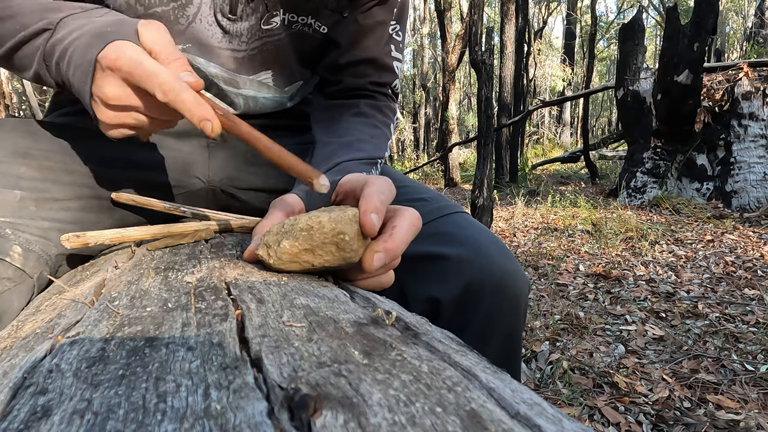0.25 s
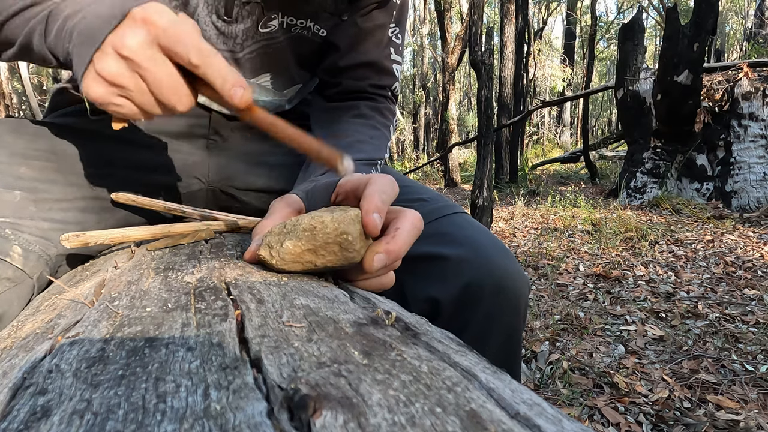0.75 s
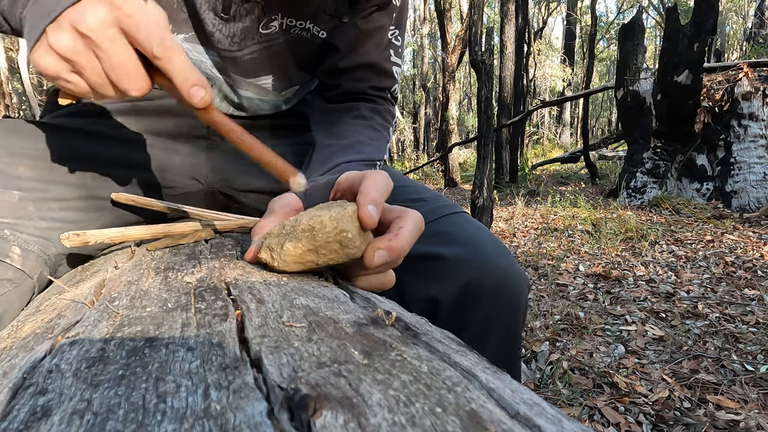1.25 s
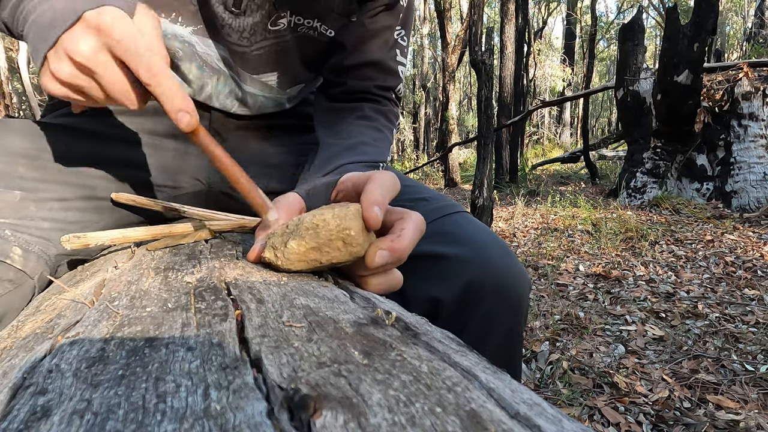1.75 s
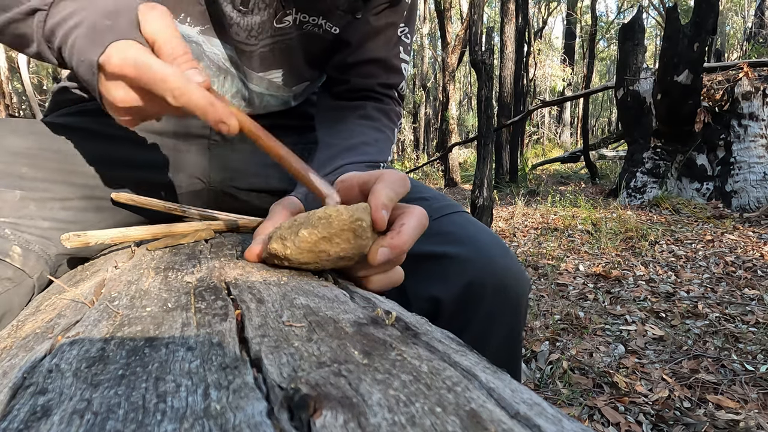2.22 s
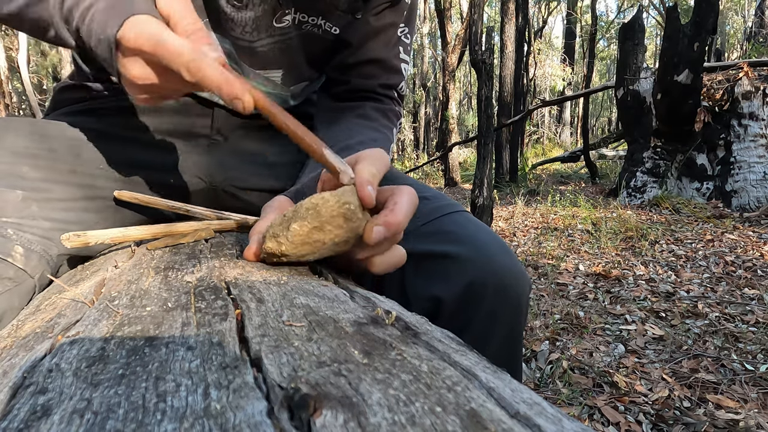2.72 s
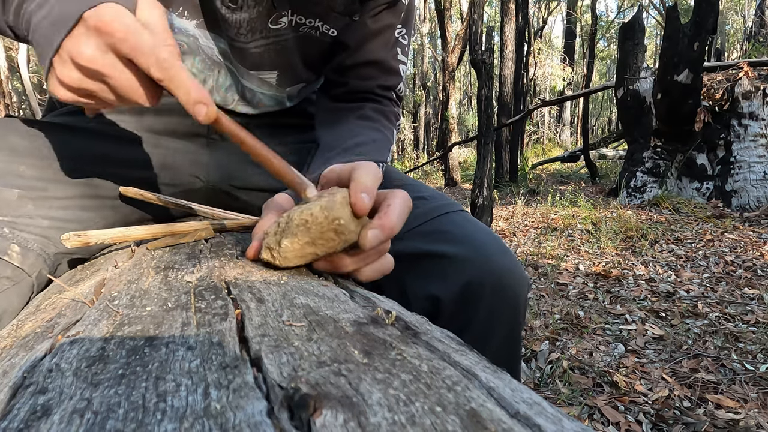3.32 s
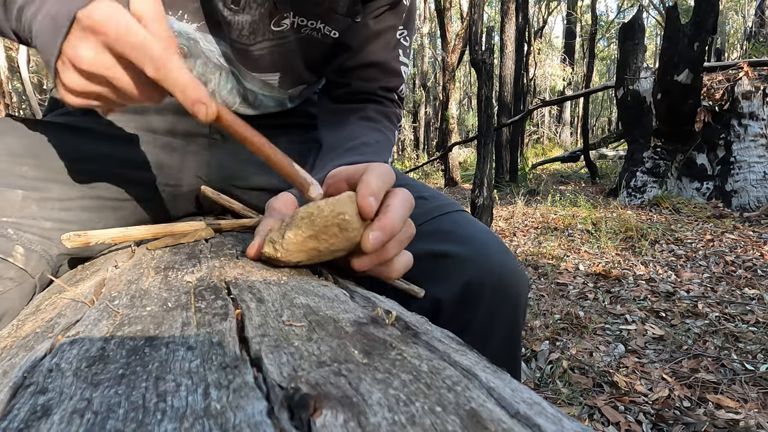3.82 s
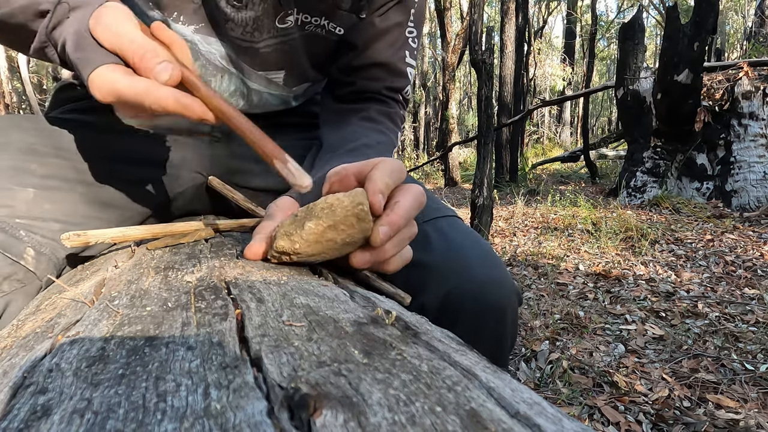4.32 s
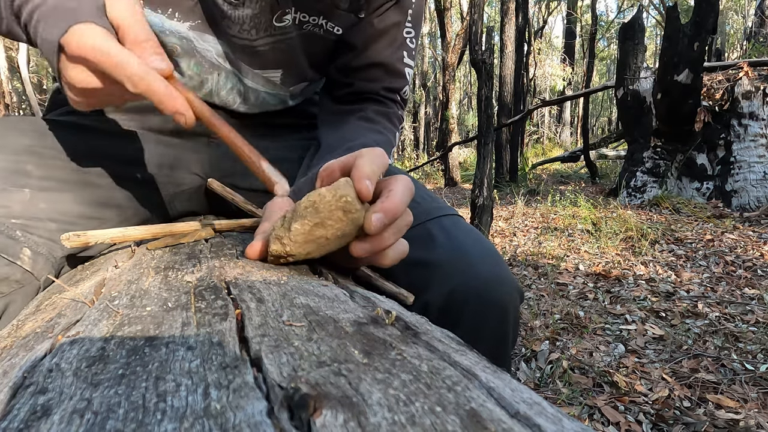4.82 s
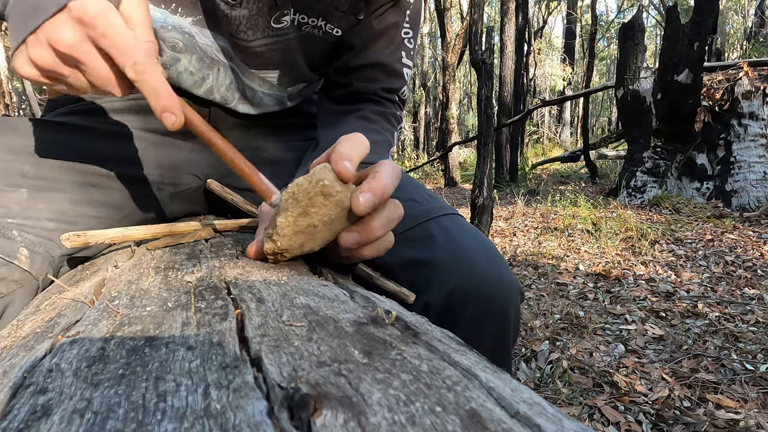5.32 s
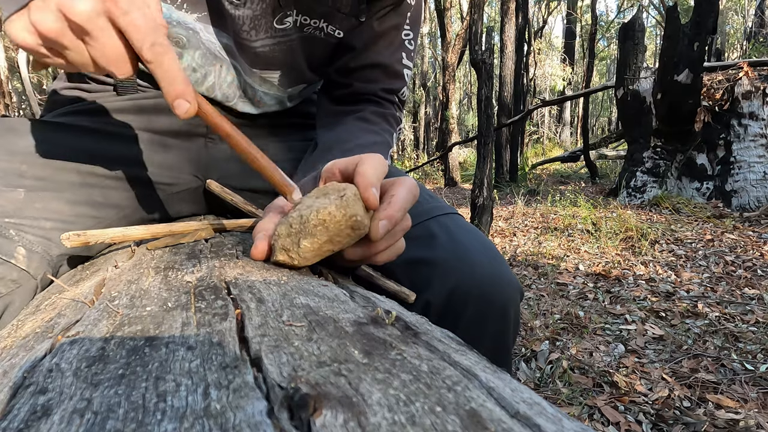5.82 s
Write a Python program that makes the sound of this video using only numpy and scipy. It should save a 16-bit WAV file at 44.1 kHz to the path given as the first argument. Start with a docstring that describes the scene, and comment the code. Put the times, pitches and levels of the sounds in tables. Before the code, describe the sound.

Quiet bushland, heard very close with little echo: soft steady air and faint sleeve rustle. From 0 to 0.4 s a stick makes weak, uneven scrapes on a rough stone; near 0.18 s the stone knocks dully on a log and slides softly. After a short gap, light rasps return at about 0.5 s and settle by 1 s into regular strokes every 0.27 s, each a dry woody tap followed by a tenth-second gritty scrape, many swelling, with bright snaps of grain. At 1.51 s a hollow knock coincides with a tiny, falling squawk. From about 2.1 s low wind rumble flutters at the microphone in gusts. The grinding becomes louder and harsher, with a strong rasp around 4.6 s and sharp taps near 4.3 and 4.8 s. Rustling increases after 3.9 s. Deep soft bumps join around 5.35 and 5.6 s; the final stroke at 5.9 s fades quickly.

```python
"""Stick ground on a hand-held stone

Close in front, in quiet bushland, a wooden stick is ground against a rough stone held over a log.
Blows of force ring the stick's modes as each stroke lands; random tiny slips make the rasp over the grit.
Larger grains snap, a squawk sounds once, and the stone knocks and slides on the log as decaying modes.
Behind are coloured noise for still air, slips for rustling sleeves, and a breeze that starts to rumble
at the microphone."""
import sys
import numpy as np
from scipy import signal
from scipy.fft import rfft, irfft, next_fast_len
from scipy.io import wavfile

SR = 44100
rng = np.random.default_rng(int(sys.argv[2]) if len(sys.argv) > 2 else 0)


def dump_mix(stems):
    """Bounce the given channels to the path in sys.argv[1] as a 16-bit WAV at rate SR."""
    frames = np.atleast_2d(stems).T  # one column per channel
    limited = np.clip(frames, -1, 1)  # hard clip at full scale
    pcm = np.round(limited * 32767).astype(np.int16)
    wavfile.write(sys.argv[1], SR, pcm)


N = 267246
TIME = np.arange(N) / SR  # s

# The tip is pushed across the stone: start t/s, length/s, nominal mid-stroke level/dB,
# swell from start to end/dB, hiss of fine grit relative to the rasp/dB,
# drive of the cupped hand's hollow note relative to the rasp/dB
STROKES = [(.006, .104, -41, -5, -9.5, -27), (0.162, 0.034, -37, 0, -15, -14),
           (0.232, 0.072, -42.5, -4, -10, 8), (0.56, .064, -40.5, 5, -4, 8.5),
           (0.707, 0.13, -43, 5, -0.5, 5.5), (0.968, .14, -40, 14, -3, -6), (1.263, 0.028, -42, 9, -3, -8),
           (1.287, 0.099, -38.5, 5, -3, -21), (1.542, .11, -39.5, 17, -2, -17),
           (1.804, 0.12, -34, 7, -3.5, -5), (2.087, 0.11, -38.5, 15.5, -1, 0),
           (2.351, .15, -35.5, 4, -4.5, -25), (2.626, 0.12, -34, 15, -3.5, -9),
           (2.917, 0.12, -35.5, 0, -3.5, -21), (3.189, .13, -40, 9, 0, -18),
           (3.466, 0.11, -39, 4, -0.5, -29), (3.731, 0.109, -36.5, 17, -3.5, -12),
           (4.007, 0.12, -37, 18, -4, -6), (4.301, 0.13, -35, -3, -7, -10),
           (4.568, 0.1073, -28, 11.5, -7.5, -14), (4.844, 0.13, -35.5, -7.5, -3, -25),
           (5.106, 0.11, -35.5, 1, -1.5, 6.5), (5.38, .093, -36, 9.5, 0, 5),
           (5.648, 0.1, -37, 3.5, 0.5, -1), (5.911, 0.086, -43, -21, 2, 6.5)]


def amp(db):
    """Decibels to gain."""
    return 10 ** (np.asarray(db) / 20)


def evened(x):
    """Scales to an rms of one."""
    return x / np.sqrt(np.mean(x ** 2) + 1e-20)


def shaped(x, gain_db):
    """Filters x, without delay, by a function that gives dB at each frequency."""
    size = next_fast_len(len(x) + 512)
    gain = amp(gain_db(np.fft.rfftfreq(size, 1 / SR)))
    return irfft(rfft(x, size) * gain, size)[:len(x)]


def coloured(x, points):
    """Filters x by a table of f/Hz, level/dB, joined along log frequency."""
    f, db = np.transpose(points)
    return shaped(x, lambda hz: np.interp(np.log(hz + 1), np.log(f), db))


def band(x, hz, kind):
    """Low-pass or high-pass, fourth order."""
    return signal.sosfilt(signal.butter(4, hz, kind, fs=SR, output="sos"), x)


def wander(size, rate):
    """Random values, drawn rate times a second and joined by straight lines."""
    knots = rng.standard_normal(size)
    return np.interp(np.arange(size) * rate / SR, np.arange(size), knots)


def add(mix, s, sound):
    """Mixes a sound in at time s."""
    part = mix[max(round(s * SR), 0):][:len(sound)]
    part += sound[:len(part)]


def blow(x, db):
    """Sets the energy of a short sound, as its level over 5 ms."""
    return amp(db) * x / np.sqrt(np.sum(x ** 2) / (.005 * SR))


def resonance(x, hz, width):
    """A decaying cosine rings at one frequency, with a peak gain near one; width is in Hz."""
    t = np.arange(600) / SR
    decay = np.exp(-np.pi * width * t)
    ring = 2 * decay / decay.sum() * np.cos(2 * np.pi * hz * t)
    return signal.fftconvolve(x, ring)[:N]


def slips(size, rate, spread_db):
    """Tiny slips over the grit: random clicks, rate a second, most small and a few large."""
    hit, height, sign = rng.random((size, 3)).T
    sizes = amp(spread_db * np.minimum(-np.log(1 - height), 4))
    return (hit < rate / SR) * sizes * np.sign(sign - .5)


def still_air(level_db=-56):
    """Still air among the trees: steady coloured noise, its level set above 200 Hz."""
    # Colour of the air: f/Hz, level/dB per Hz
    air_colour = [(12, -41), (20, -33), (112, 0), (175, 7.5), (811, -4.5), (985, -3.5), (1500, -9.5),
                  (1720, -9.5), (2150, -42), (2540, -27), (2760, -57), (3170, -22.5), (7520, -28.5),
                  (12400, -67), (15500, -67)]
    air = coloured(rng.standard_normal(N), air_colour)
    return air * amp(level_db) / np.std(band(air, 200, "high"))


def rustle(trim_db=-3):
    """Hands and sleeves move: dense random slips whose strength wanders."""
    # Level before the trim: t/s, level/dB
    rustle_level = [(0, -56.5), (.45, -55), (1.7, -56.5), (3.65, -53.5), (3.95, -47.5), (4.2, -51.5),
                    (4.9, -51), (5.55, -49.5), (6.0, -50.5)]
    # Colour of the cloth and skin: f/Hz, level/dB per Hz
    rustle_colour = [(100, -0.5), (300, 0.5), (1200, -7), (3500, -12), (7500, -16), (10000, -32),
                     (15000, -35)]
    rubs = slips(N, 6000, 2.5) * amp(3.07 * wander(N, 45))
    level_db = np.interp(TIME, *np.transpose(rustle_level)) + trim_db
    return amp(level_db) * evened(coloured(rubs, rustle_colour))


def wind(flutter_db=5.5, flutter_rate=37):
    """Strength of the breeze: a fluttering level, with gusts that rise and fall in an arch."""
    # Steady breeze at the microphone, before flutter: t/s, level/dB
    breeze_level = [(0, -54), (.8, -60), (1.2, -54.5), (1.7, -60), (2.2, -43), (3.0, -47), (3.3, -43),
                    (3.55, -49), (4.3, -45.5), (5.1, -44), (6.0, -42)]
    # Stronger gusts: start t/s, length/s, peak level/dB
    gust_times = [(2.13, .09, -36.5), (2.302, 0.27, -35), (2.54, 0.24, -33), (2.96, 0.12, -38.5),
                  (3.764, 0.11, -33.5), (4.533, 0.062, -30.5), (4.743, 0.3, -39), (5.136, .08, -34),
                  (5.33, 0.2, -39), (5.53, .37, -32.5)]
    gusts = np.zeros(N)
    for start, length, db in gust_times:
        arch = np.sin(np.pi * np.arange(0, length, 1 / SR) / length)
        add(gusts, start, amp(db) * arch)
    steady_db = np.interp(TIME, *np.transpose(breeze_level))
    steady = amp(steady_db + flutter_db * wander(N, flutter_rate))  # rate in changes per s
    return np.hypot(gusts, steady)


def breeze():
    """Moving air rumbles at the microphone: low noise that follows the wind's strength."""
    # Colour of the rumble: f/Hz, level/dB per Hz
    breeze_colour = [(12, -0.5), (30, 4.5), (65, -3), (100, -13.5), (160, -17.5), (300, -35), (800, -61)]
    return evened(coloured(rng.standard_normal(N), breeze_colour)) * wind()


def surroundings(x, level_db=-23, t60=0.25):
    """Body, ground and trunks scatter faint sound back: a noise tail that falls 60 dB in t60 seconds."""
    t = np.arange(SR // 3) / SR
    tail = rng.standard_normal(len(t)) * amp(-60 * t / t60) * (t > .003)
    return amp(level_db) * signal.fftconvolve(x, tail / np.linalg.norm(tail))[:N]


def thumps(rise=0.0031):
    """The pressing hand bumps the log: soft, low tones that swell over rise seconds and die away."""
    # Bumps: t/s, level over 5 ms/dB, f/Hz, decay/s
    bumps = [(1.511, -31, 172, 0.018), (2.357, -30.5, 159, 0.0044), (2.362, -26.5, 52.5, 0.016),
             (2.41, -32, 140, 0.0054), (3.013, -35.5, 66.6, 0.022), (5.345, -22.5, 55.8, 0.02),
             (5.389, -24.5, 80.5, 0.017), (5.618, -20.5, 61, 0.039), (5.727, -30, 57.3, 0.0083)]
    out, t = np.zeros(N), np.arange(SR // 6) / SR
    for s, db, hz, decay in bumps:
        envelope = np.exp(-t / decay) * (1 - np.exp(-t / rise))
        add(out, s, blow(np.sin(2 * np.pi * hz * t) * envelope, db))
    return out


def knocks(rise=0.00064):
    """The stone rocks against the log, whose decaying modes give a dull, hollow knock."""
    # Knocks: t/s, level over 5 ms/dB
    knock_times = [(0.1763, -33.5), (0.1798, -26), (1.5101, -20), (2.3574, -30)]
    # Modes of the stone on the log: f/Hz, level/dB, t60/s
    log_modes = [(188.6, -12, 0.15), (530, -15, 0.14), (944, 4.5, 0.028), (1020, -3, 0.059),
                 (1420, -6, 0.019), (1540, 3, 0.013)]
    out, t = np.zeros(N), np.arange(SR // 10) / SR
    ring = sum(amp(db - 60 * t / t60) * np.sin(2 * np.pi * hz * t) for hz, db, t60 in log_modes)
    for s, db in knock_times:
        add(out, s, blow(ring * (1 - np.exp(-t / rise)), db))
    return out


# The tip, or the sliding stone, takes hold and lifts off (s)
ATTACK_S, RELEASE_S = 0.012, 0.014


def hold(t, length):
    """Contact takes hold in a straight ramp from 0 to 1 and lifts off in another."""
    return np.clip(np.minimum(t / ATTACK_S, (length - t) / RELEASE_S), 0, 1)


def slide(modes=((990, 190, 0), (1520, 330, -5))):
    """The stone drags softly on the log; slips ring two broad resonances (f/Hz, width/Hz, level/dB)."""
    # The slide: start t/s, length/s, reference level/dB, swell from start to end/dB
    drag = (.075, .125, -39, 7)
    start, length, db, swell_db = drag
    out, t = np.zeros(N), np.arange(0, length, 1 / SR)
    force = slips(len(t), 5000, 2.8)
    sound = sum(amp(mode_db) * resonance(force, hz, width) for hz, width, mode_db in modes)[:len(t)]
    level = amp(db + swell_db * (t / length - 2.5))  # ends 1.5 swells below the reference
    add(out, start, hold(t, length) * level * evened(sound))
    return out


def stick_ring(grip=1, uneven_db=0, rise=0.00054, echo_s=0.001475, echo=0.067):
    """The stick's modes swell briefly and die in the hand; the log's face throws them back."""
    # Modes of the gripped stick against the stone: f/Hz, width/Hz, level/dB
    stick_modes = [(630, 1030, 1), (1006, 172, 5.5), (1327, 306, 4.5), (2060, 363, 3.5), (2733, 336, -0.5),
                   (3530, 670, -4), (4224, 170, -4.5), (5340, 760, -11.5), (6290, 375, -14.5),
                   (7530, 630, -14), (8890, 1250, -23), (11940, 2600, -26)]
    t = np.arange(600) / SR
    ring = np.zeros(len(t))
    for hz, width, db in stick_modes:
        decay = np.exp(-np.pi * width * t) * (1 - np.exp(-t / rise))
        # each point of contact favours other modes, most of all the low ones
        favour_db = uneven_db * rng.standard_normal() * min(1, 3000 / hz)
        ring += amp(db + favour_db) * decay / decay.sum() * np.sin(2 * np.pi * hz * grip * t)
    return ring + echo * np.interp(t - echo_s, t, ring, left=0)


def hardened(x, slope_db, main_db=0, lower_db=0):
    """A harder contact tilts the sound upwards; the grip frees or damps the stick's strongest modes."""
    def gain_db(hz):
        tilt = slope_db * np.log2(np.clip(hz, 1000, 4500) / 1500)
        main = main_db * np.exp(-((hz - 2280) / 560) ** 2)
        lower = lower_db * np.exp(-((hz - 1400) / 250) ** 2)
        return tilt + main + lower
    return shaped(x, gain_db)


def ticks():
    """Crumbs of grit break off: very short noise bursts ring the stick as small bright clicks."""
    # Crumbs: t/s, level over 5 ms/dB
    crumbs = [(0.21, -51), (0.3446, -37.5), (0.377, -54), (3.366, -50), (3.922, -44), (3.954, -42.5)]
    out, t = np.zeros(N), np.arange(400) / SR
    for s, db in crumbs:
        force = rng.standard_normal(len(t)) * np.exp(-t / 0.00059)
        click = hardened(signal.fftconvolve(force, stick_ring()), 2.1)
        add(out, s, blow(click, db))
    return out


def squawk(overtone=0.038):
    """The tip judders once, sticking and slipping in an unsteady cycle that slows as it comes to rest."""
    # Path of the squawk, before its random unsteadiness: t/s, f/Hz, level/dB
    squawk_path = [(1.5085, 1500, -52), (1.511, 1200, -25), (1.512, 880, -18), (1.514, 880, -18.5),
                   (1.516, 950, -29), (1.521, 900, -32), (1.524, 570, -36), (1.537, 540, -45),
                   (1.546, 500, -62)]
    s, hz, db = np.transpose(squawk_path)
    t, out = np.arange(s[0], s[-1], 1 / SR), np.zeros(N)
    pitch = np.interp(t, s, hz) * (1 + .09 * wander(len(t), 500))
    level = amp(np.interp(t, s, db) + 1.8 * wander(len(t), 400))
    phase = 2 * np.pi * np.cumsum(pitch) / SR
    add(out, s[0], np.sqrt(2) * level * (np.sin(phase) + overtone * np.sin(2 * phase)))
    return band(out, 3900, "low")


def catches(crumble_s=0.0023, crumble=0.15, tilt_db=-0.27):
    """The tip catches on a large grain and slips free with a snap and a short spray of noise."""
    # Catches: t/s, level over 5 ms/dB, hardness before the common tilt/dB per octave
    grains = [(0.0233, -35, 2.5), (0.0625, -32, -1), (0.0681, -31.5, 1), (0.2641, -29.5, -1),
              (.29, -37, -2), (.7354, -29.5, 19), (.7989, -34, 8), (.8227, -35.5, -22), (1.079, -28.5, 2),
              (1.0964, -28, -8), (1.3088, -29, 5), (1.3507, -26.5, -0.5), (1.6241, -22, 0.5),
              (1.6318, -22, 0), (1.856, -31.5, 29), (1.9045, -19, 2.5), (2.139, -28.5, 2),
              (2.1667, -26, -6), (2.414, -25.5, 2.5), (2.4671, -29, 7), (2.6726, -30, 4),
              (2.6967, -21.5, 11), (2.7317, -22, 4), (2.7356, -21.5, -1.5), (2.941, -20.5, -3),
              (3.0097, -19.5, 1), (3.0162, -25, 3), (3.283, -31, 5), (3.3022, -31, -14),
              (3.4822, -28.5, -1.5), (3.55, -26.5, 1), (3.7492, -25.5, 3), (3.7898, -20, 2),
              (3.8217, -23.5, 0), (4.0485, -31, 4), (4.0658, -26, -3.5), (4.101, -25, -13),
              (4.3315, -30, 1.5), (4.3376, -35, 3), (4.3958, -28.5, -4), (4.6035, -35, 0), (4.619, -29, -1),
              (4.6458, -20, -2), (4.6549, -22.5, -5), (4.8754, -31, 1.5), (5.124, -24, 4.5),
              (5.1416, -26, 2), (5.16, -26, -0.5), (5.172, -25, -10), (5.3928, -21.5, -2.5),
              (5.3993, -22.5, 3.5), (5.4329, -26.5, -21), (5.6882, -26, 4.5), (5.7125, -26, -18),
              (5.7345, -28.5, -33)]
    # Force of a large grain letting go: f/Hz, level/dB
    catch_force = [(100, -12.5), (350, -8.5), (700, -6.5), (1000, 4.5), (1400, 2.5), (2100, 1.5),
                   (3000, 3.5), (6000, -2), (9000, -1), (13000, -8.5), (15500, -6)]
    out, t = np.zeros(N), np.arange(400) / SR
    for s, db, hardness in grains:
        force = crumble * rng.standard_normal(len(t)) * np.exp(-t / crumble_s)
        force[0] = 1
        ring = stick_ring(grip=1 + 0.057 * rng.standard_normal(), uneven_db=-0.5)
        snap = np.pad(signal.fftconvolve(force, ring), (12, 0))  # room ahead for the delay-free filters
        snap = coloured(snap, catch_force)
        add(out, s, blow(hardened(snap, hardness + tilt_db), db))
    return out


def taps(click_db=-17):
    """The tip lands with one dry blow to the stick and a pinch of grit crushed under it."""
    # Landings: t/s, level over 5 ms/dB, hardness/dB per octave,
    # ring of the stick's main mode/dB, ring of its lower mode/dB
    landings = [(0.4932, -30, -3.5, 3.5, 11.5), (0.9635, -21.5, 4, -3.5, 4.5), (1.2348, -21, 8.5, -3, 2),
                (1.496, -30, -2, -2, 6), (1.7826, -23.5, 5.5, -5.5, 5), (2.0587, -25.0, -0.5, -0.5, -4.5),
                (2.346, -27, -4, -1, -4), (2.6212, -24.5, -3.5, 8.5, 2), (2.8998, -21, 1, 3.5, 6.5),
                (3.182, -26.5, -4, 4, -6), (3.4623, -24.5, 0, 6.5, 3), (3.7065, -29.5, -4, -5.5, -5),
                (3.9983, -25, -2.5, 5, -2), (4.2964, -18, 0, 11, 6), (4.547, -29.5, 1, -3, 6.5),
                (4.8319, -19, -2, 9.5, 0), (5.0975, -35, -9, 1, -16), (5.3567, -26.5, -4.5, 3.5, -2),
                (5.6223, -25, -4.5, 8, 3), (5.9023, -22.5, 4, 0, 0.5)]
    # Force of a landing: f/Hz, level/dB
    tap_force = [(100, -22), (500, 0.5), (1300, 1.5), (2100, 5.5), (3000, 4), (4300, -4), (6500, -10),
                 (10000, -15), (15000, -29)]
    out, t = np.zeros(N), np.arange(200) / SR
    for s, db, hardness, main_db, lower_db in landings:
        grit = amp(click_db) * rng.standard_normal(len(t)) * np.exp(-t / 0.0019)
        force = band(grit, 2660, "high")
        force[0] = 1  # the blow itself
        ring = np.pad(signal.fftconvolve(force, stick_ring()), (16, 0))  # room ahead for the filters
        ring = coloured(ring, tap_force)
        add(out, s - .0004, blow(hardened(ring, hardness, main_db, lower_db), db))
    return out


def stroke(length, swell_db, ease_db=1, ease_at=0.82, ease_width=0.19, touch_db=-18):
    """One push of the hand: its pressure in dB, easing off late, and the gain of the tip's contact."""
    t = np.arange(0, length, 1 / SR)
    along = t / length  # ease_at and ease_width are shares of the stroke too
    pressure_db = swell_db * (along - .5) - ease_db * np.exp(-((along - ease_at) / ease_width) ** 2)
    return pressure_db, amp(touch_db * (1 - hold(t, length)))  # touch_db at first and last touch


def rasp(slip_rate=3600, spread_db=2.5, clump_db=4.0, clump_rate=240, bump_db=0.5, bump_rate=68.5,
         grip_spread=0.059, roll_rate=28, hiss_hz=3000, hiss_lag=0.31, trim_db=-1.5):
    """The tip skips over clumps of grit; its slips ring the stick, whose colour shifts as the tip rolls."""
    # Force of a slip: f/Hz, level/dB
    slip_force = [(100, -7.5), (300, -1), (700, -1), (1500, 3.5), (3000, 3), (6000, 5.5), (9000, 6.5),
                  (12500, -2.5), (15500, 3)]
    out, size = np.zeros(N), SR // 3
    for start, length, db, swell_db, hiss_db, _ in STROKES:
        pressure_db, contact = stroke(length, swell_db)
        clumps_db = clump_db * wander(size, clump_rate)
        face_db = bump_db * wander(size, bump_rate)  # the stone's face is uneven
        force = slips(size, slip_rate, spread_db) * amp(clumps_db + face_db)

        roll = wander(size, roll_rate)  # the load passes between two edges of the tip
        rings = [stick_ring(grip=1 + grip_spread * rng.standard_normal(), uneven_db=2.5)
                 for edge in range(2)]
        on_first = rng.random(size) < .5 + .5 * np.tanh(2 * roll)
        sound = signal.fftconvolve(force * on_first, rings[0])
        sound += signal.fftconvolve(force * ~on_first, rings[1])
        sound = coloured(sound, slip_force)[len(rings[0]):][:len(contact)]  # skip the build-up

        coarse = evened(band(sound, hiss_hz, "low"))
        fine = evened(band(sound, hiss_hz, "high"))
        hiss = amp(hiss_db - hiss_lag * pressure_db)  # hiss gains less as the pressure rises
        add(out, start, contact * amp(db + pressure_db) * (coarse + hiss * fine))
    return amp(trim_db) * out


def hollow(x, hz=440, width=190):
    """The hand cupped round the stone resonates low and hollow, differently from stroke to stroke."""
    cup = np.zeros(N)
    for start, length, *_, hollow_db in STROKES:
        add(cup, start, np.full(round(length * SR), amp(hollow_db)))
    return resonance(x * cup, hz, width)


def bite(x, hard_db=-33, amount=0.46, hz=1520, width=500):
    """Pressed hard, the tip chatters at the contact's resonance, which partly replaces the plain rasp."""
    chatter = np.zeros(N)
    for start, length, db, swell_db, *_ in STROKES:
        pressure_db, _ = stroke(length, swell_db)
        add(chatter, start, .5 + .5 * np.tanh((db + pressure_db - hard_db) / 5))
    return x + amount * chatter * (1.44 * resonance(x, hz, width) - 0.41 * x)


def ports(x, scatter_s=0.0013, shift_rate=6):
    """Two close microphone ports hear nearly the same; shifting reflections from the hands set them apart."""
    # Difference between the ports: f/Hz, side minus mid level/dB
    spread = [(30, -13), (250, -10.5), (1000, -15.5), (2500, -13), (5000, -9), (9000, -8), (13000, -4.5)]
    # Balance of the ports: f/Hz, left minus right level/dB
    balance = [(50, -6), (150, -1), (500, 1), (2500, 0.5), (5000, 2.5), (9000, 3), (13000, 3.5)]
    t = np.arange(500) / SR
    turn = np.pi * wander(N, shift_rate)
    side = np.zeros(N)
    for share in np.cos(turn), np.sin(turn):
        scatter = rng.standard_normal(len(t)) * np.exp(-t / scatter_s) * (t > .0005)
        side += share * signal.fftconvolve(x, scatter / np.linalg.norm(scatter))[:N]
    side = coloured(side, spread)
    lean = np.array(balance)
    left = coloured(x + side, lean * [1, .5])  # each port takes half the balance
    right = coloured(x - side, lean * [1, -.5])
    return np.array([left, right])


def scene():
    """The grinding, close in front, in the open air."""
    background = still_air() + rustle() + breeze()
    rubbing = rasp()
    stick = taps() + bite(rubbing) + hollow(rubbing) + catches() + ticks() + squawk()
    work = stick + knocks() + slide()
    scattered = np.array([surroundings(work), surroundings(work)])
    return ports(work + thumps() + background) + scattered


def record(dry, edge_hz=16300):
    """The microphone's soft top end, then the recorder's band limit."""
    # Response of the microphone: f/Hz, level/dB
    microphone = [(100, -2.5), (11000, 0), (13000, -0.5), (14500, -18), (15500, -17), (16300, -23)]
    heard = np.array([coloured(channel, microphone) for channel in dry])
    limit = signal.firwin(511, edge_hz, window=("kaiser", 9), fs=SR)
    return signal.oaconvolve(heard, limit[None], "same")


dry = scene()
out = record(dry)
dump_mix(out)
```